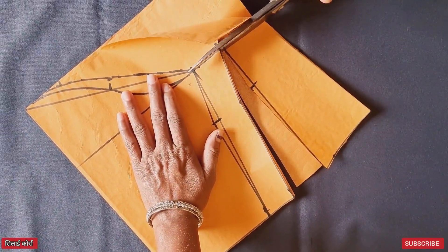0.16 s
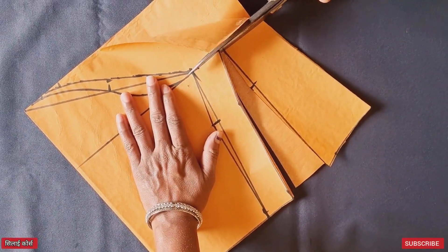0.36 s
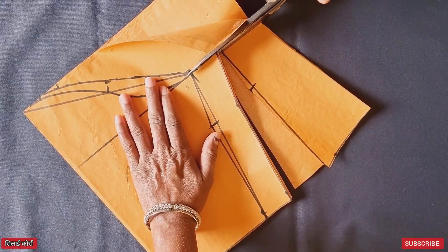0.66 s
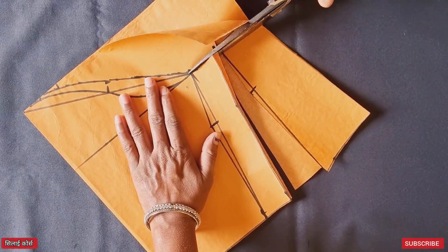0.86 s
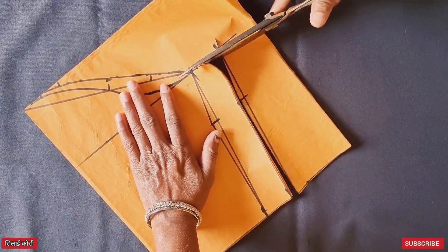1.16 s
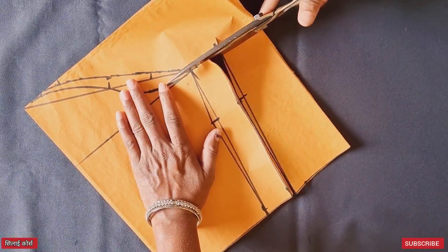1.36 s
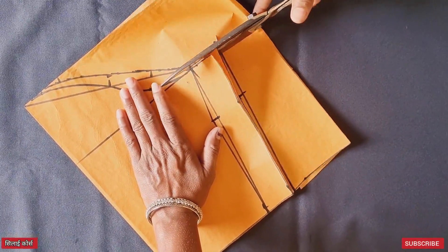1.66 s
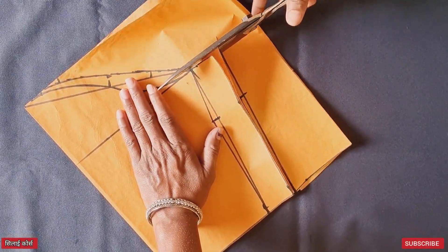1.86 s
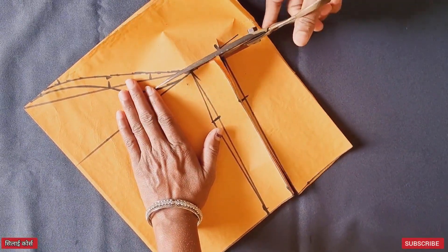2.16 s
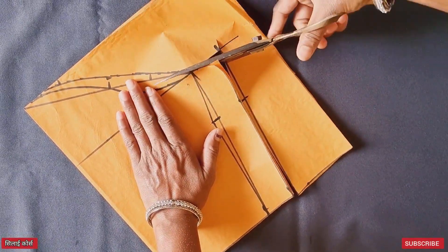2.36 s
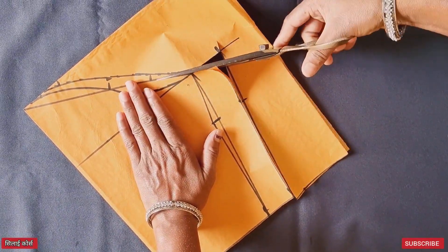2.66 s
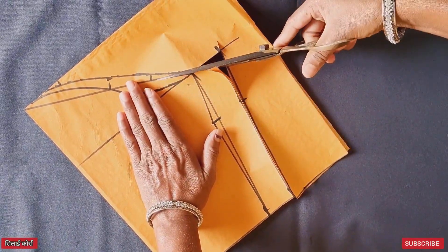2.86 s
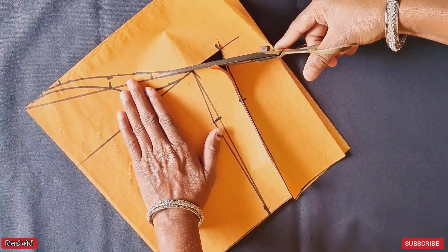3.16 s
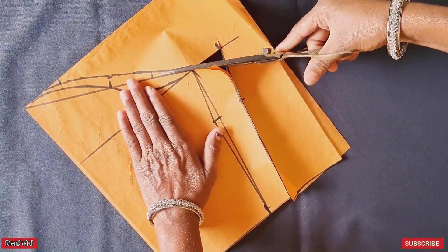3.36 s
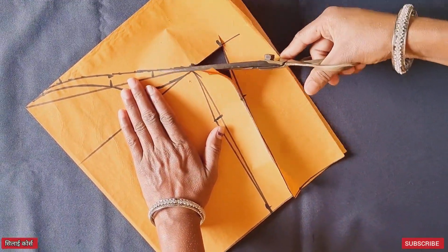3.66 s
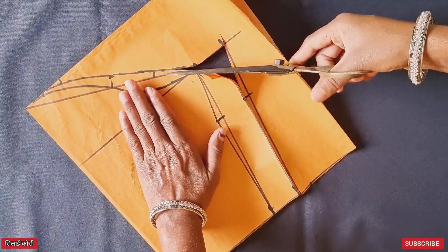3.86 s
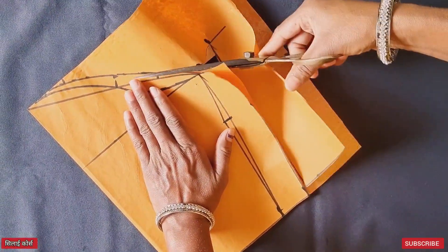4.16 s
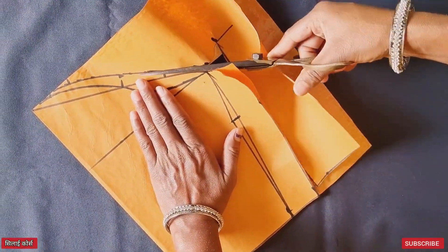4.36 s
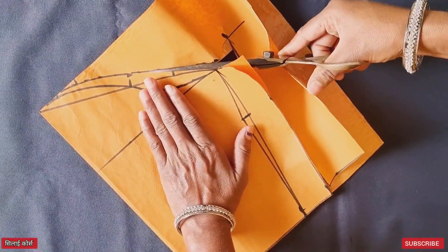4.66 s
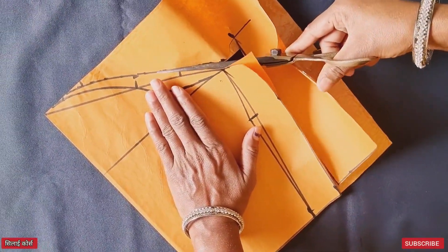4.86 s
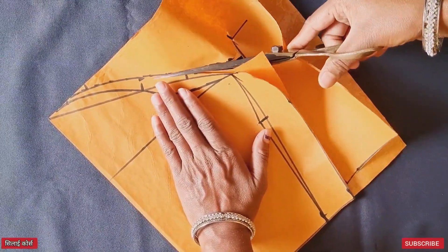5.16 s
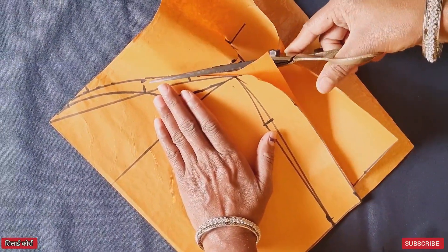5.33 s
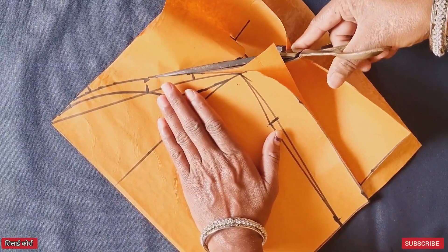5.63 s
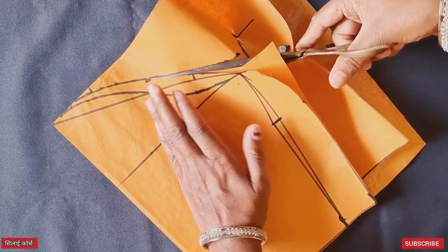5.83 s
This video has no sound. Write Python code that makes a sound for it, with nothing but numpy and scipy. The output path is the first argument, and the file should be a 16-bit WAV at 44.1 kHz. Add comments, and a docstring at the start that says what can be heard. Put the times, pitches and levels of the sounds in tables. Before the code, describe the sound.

Close-up paper cutting: crisp grainy snips and rustles over soft table thumps, starting faint and building to the loudest cuts late.

```python
"""Scissors through folded paper

Close up, on a cloth-covered wooden table: sheets slide and hiss, blades bite in short tearing bursts, creases snap.
Paper is grainy noise and clicks through a bank of coloured bands; the table is friction noise and jolts
through resonant modes, as the lower blade drags on its top. A faint thin ring is noise in narrow resonances,
over steady room and microphone noise. Two microphone ports hear it all in stereo.
"""
import sys
import numpy as np
from scipy import signal
from scipy.io import wavfile

SR = 44100
rng = np.random.default_rng(int(sys.argv[2]) if len(sys.argv) > 2 else 0)


def inscribe(sig):
    """Save sig as 16-bit PCM at rate SR to the path in sys.argv[1].

    A 1-D sig is mono; a 2-D sig holds one channel per row.
    Samples are clipped to [-1, 1] before scaling.
    """
    pcm = np.round(np.clip(np.atleast_2d(sig).T, -1, 1) * 32767)
    wavfile.write(sys.argv[1], SR, pcm.astype(np.int16))


N = 264245


def from_db(db):
    """Amplitude gain of a level in dB."""
    return 10 ** (np.asarray(db) / 20)


def rms_one(x):
    """Scales a signal to rms 1."""
    return x / np.sqrt(np.mean(x ** 2) + 1e-20)


def in_time(rows):
    """Turns the columns after t into curves, one value a sample."""
    seconds, *columns = np.transpose(rows)
    return [np.interp(np.arange(N) / SR, seconds, column) for column in columns]


def at_hz(points, hz):
    """Reads a spectrum table along a log-frequency axis."""
    table_hz, values = np.array(points).T
    return np.interp(np.log(hz), np.log(table_hz), values)


def drift(rate_hz):
    """Slow random wander of rms 1: noise through two equal low-pass poles at rate_hz."""
    step = 40     # samples between the points of the wander
    r = np.exp(-2 * np.pi * rate_hz * step / SR)
    noise = rng.standard_normal(N // step + 2002)
    slow = signal.lfilter([1], [1, -2 * r, r * r], noise)[2000:]     # drops the filter's start-up
    return np.interp(np.arange(N) / step, np.arange(len(slow)), rms_one(slow))


def bands(low_hz, count, per_octave):
    """Centre and band-pass filter of each band of a bank."""
    edges = low_hz * 2 ** (np.arange(count + 1) / per_octave)
    edges = np.minimum(edges, .45 * SR)
    return [(np.sqrt(a * b), signal.butter(2, [a, b], "band", fs=SR, output="sos"))
            for a, b in zip(edges, edges[1:])]


def ports(mid, side, alike, lean_db):
    """Mixes two independent signals into ports with a set likeness and left-minus-right level."""
    alike = np.clip(alike, -1, 1)
    opposite = np.array([[1], [-1]])
    shared = np.sqrt(1 + alike) * mid
    differing = np.sqrt(1 - alike) * side * opposite
    return from_db(lean_db / 2 * opposite) * (shared + differing) / np.sqrt(2)


def resonate(x, modes):
    """Sums parallel two-pole resonances with alternating signs."""
    out = 0
    for k, (hz, width_hz, level_db) in enumerate(modes):
        r = np.exp(-np.pi * width_hz / SR)
        poles = [1, -2 * r * np.cos(2 * np.pi * hz / SR), r * r]
        ring = signal.lfilter([(1 - r * r) / 2, 0, (r * r - 1) / 2], poles, x)
        out = out + (-1) ** k * from_db(level_db) * ring
    return out


# Likeness of the two ports, for paper and room: f/Hz, likeness [1 same, 0 unrelated, -1 opposite]
LIKENESS = [(60, .9), (350, .9), (700, .5), (1700, .65), (2400, .55), (3000, .25), (4500, -.1), (6500, .3),
            (8000, 0)]
LEAN_DB = 1.7     # left minus right, for room and table
# Relative spectrum of the room and microphone noise: f/Hz, level/dB per Hz
ROOM = [(15, -43), (25, -6), (102, -2.5), (189, -11.5), (241, -42.5), (284, -3), (449, -58), (637, -72),
        (791, -36.5), (9210, -46.5), (15800, -27.5)]
ROOM_DB = -63     # rms over both ports


def room():
    """Steady room and microphone noise: white noise shaped by a bank of half-octave bands."""
    white = rng.standard_normal((2, 2, N))     # neighbouring bands take turns with two sources
    noise = 0
    for k, (hz, sos) in enumerate(bands(19.65, count=19, per_octave=2)):
        heard = ports(*signal.sosfilt(sos, white[k % 2]), at_hz(LIKENESS, hz), LEAN_DB)
        noise = noise + from_db(at_hz(ROOM, hz)) * heard
    return from_db(ROOM_DB) * rms_one(noise)


# Hiss of the sliding sheets: t/s, level near 2 kHz/dB, before its random wander
SLIDE = [(0.0, -87), (.15, -87.5), (.22, -77.5), (.4, -73.5), (.65, -61), (.89, -62.5), (1.0, -54),
         (1.47, -55), (1.53, -60.5), (1.62, -57), (1.77, -51.5), (2.0, -62), (2.11, -56), (2.22, -64.5),
         (2.33, -51.5), (2.55, -75), (2.88, -79.5), (3.0, -64.5), (3.2, -77), (3.33, -59.5), (3.72, -65.5),
         (3.99, -45), (4.1, -52), (4.33, -82), (4.44, -54.5), (4.66, -72.5), (4.77, -44.5), (4.9, -52.5),
         (5.1, -56), (5.32, -64), (5.44, -54.5), (5.66, -60), (5.77, -56.5), (5.99, -59.5)]


def sliding():
    """Hiss level of the sheets in dB; it flutters as the sheet sticks and lets go."""
    (slide_db,) = in_time(SLIDE)
    return slide_db + 0.5 * drift(36) + 0.13 * drift(81)


def paper_effort(treble_db, low_db):
    """Log amplitude of the fibre noise in low mids, body and treble: sliding, nibbles and bites."""
    slide_db = sliding()
    power = from_db([slide_db + low_db, slide_db, slide_db + treble_db]) ** 2 * nibbling()
    add_bites(power, low_db)
    return np.log(power) / 2


def grain():
    """Uneven loudness of the hiss, rms 1: fibres tear in tiny clumps, 900 a second on average."""
    sizes = from_db(0.97 * np.minimum(rng.exponential(1, N), 5))
    clumps = sizes * (rng.random(N) < 900 / SR)
    return rms_one(1 + 0.77 * signal.lfilter([1], [1, -.9], clumps))


CRACKLE_PER_S, CRACKLE_DB = 150, (11.9, 19)     # average rate; range of click height against the hiss


def crackle():
    """Single fibres break at random: sample, height and home band of each click."""
    breaks = np.flatnonzero(rng.random(N) < CRACKLE_PER_S / SR)
    height = from_db(rng.uniform(*CRACKLE_DB, len(breaks)))
    home_band = rng.uniform(0.51, 17.8, len(breaks))
    return breaks, height, home_band


# Usual colour of the paper noise at the microphone: f/Hz, level/dB per Hz
PAPER = [(650, -28.5), (950, -25.5), (1300, -18), (1750, -10), (2000, -8), (2350, 1.5), (2800, -5),
         (3300, -9.5), (5000, -14), (7500, -19), (8600, -20.5), (10200, -36), (12000, -23), (14500, -21)]
# Port balance for paper: f/Hz, left minus right level/dB
PORT_BALANCE = [(700, 2.6), (1200, -2), (2000, -7), (2600, -8), (3600, -5), (5500, -4), (8000, 2),
                (10000, -2), (14000, -10.5)]
# Colour as the sheets lift and settle:
# t/s, treble level/dB, low-mid level/dB, air level/dB, main resonance f/Hz before its wander
SHEET = [(0.0, 10, -2, 3, 2450), (.4, 10.5, -7, -3, 2330), (.7, 11, 3, -5.5, 2240),
         (.97, 11, 6.5, -3.5, 2510), (1.25, 8, 4, -3.5, 2310), (1.5, 9, 5.5, -1.5, 2250),
         (2.0, 6, 8.5, -3, 2240), (2.2, 5.5, -1, -5, 2300), (2.4, 5.5, 2, -5, 2270),
         (2.65, 9.5, 5, -10, 2500), (3.0, 4.5, 5, 3.5, 2160), (3.5, 10, -3, -1, 2420),
         (3.8, 7.5, 8, 1, 2570), (4.1, 7.5, 8, -3, 2370), (4.5, 3, 13.5, -1.5, 2260),
         (4.68, -1, 12.5, 0.5, 2210), (4.8, 4, 9.5, -7, 2160), (5.1, 10.5, 11.5, -1, 2330),
         (5.45, 2.5, 11, -4.5, 2250), (5.7, 13, 13, 2, 2480), (5.99, 8, 11, 0.5, 2450)]
SHEET_WANDER = .022     # rms share by which the resonance strays
LOW_MID_HZ, BODY_HZ, TREBLE_HZ, AIR_HZ = 1300, 2350, 5800, 13000     # where the colour levels apply in full


def paper():
    """Grainy fibre noise, crackle and snaps pass through the shifting colour of sheet and microphone."""
    treble_db, low_db, air_db, sheet_hz = in_time(SHEET)
    sheet_hz = sheet_hz * (1 + SHEET_WANDER * drift(6.3))
    low, body, treble = paper_effort(treble_db, low_db)
    white = rng.standard_normal((2, 2, N)) * grain()
    breaks, height, home_band = crackle()
    bank = bands(629.0, count=23, per_octave=5)
    # the usual colour's rms from 1.4 to 3.4 kHz sets the reference level
    body_power = [from_db(2 * at_hz(PAPER, hz)) * hz * .28 / SR for hz, sos in bank if 1400 < hz < 3400]
    body_rms = np.sqrt(sum(body_power))
    out = 0
    for k, (hz, sos) in enumerate(bank):
        # shares of treble, low mids and air in this band
        up = np.clip(np.log(hz / BODY_HZ) / np.log(TREBLE_HZ / BODY_HZ), 0, 1)
        down = np.clip(np.log(hz / BODY_HZ) / np.log(LOW_MID_HZ / BODY_HZ), 0, 1)
        air = np.clip(np.log(hz / TREBLE_HZ) / np.log(AIR_HZ / TREBLE_HZ), 0, 1)
        # the resonance slides, less so towards the treble
        slid_hz = hz * (BODY_HZ / sheet_hz) ** (1 - up)
        colour_db = at_hz(PAPER, slid_hz) + air * air_db
        fibres = white[k % 2].copy()
        fibres[0, breaks] += (-1) ** k * height * np.exp(-((k - home_band) / 4) ** 2)
        effort = np.exp(body + up * (treble - body) + down * (low - body))
        flicker = from_db(0.75 * drift(12.0) + 1.28 * drift(2.8))     # each band wavers by itself
        drive = fibres * effort * flicker
        add_snaps(drive, k, up, air)
        heard = signal.sosfilt(sos, drive * from_db(colour_db) / body_rms)
        out = out + ports(*heard, at_hz(LIKENESS, hz), at_hz(PORT_BALANCE, hz))
    return out


# Blade pressing on the table: full at t/s, rise/s, hold/s, low hum level/dB,
# middle modes against the hum level/dB, top modes against the hum level/dB
DRAGS = [(0.204, 0.034, 0.096, -54.5, 0.5, -5), (0.366, 0.022, 0.035, -51, 3, -1),
         (.45, 0.074, .14, -41.5, -3, -5), (0.641, 0.066, 0.084, -42.5, -1, -3),
         (0.89, 0.15, 0.097, -60, 0, -5.5), (1.362, 0.15, 0.066, -67.5, 0, -1),
         (1.621, 0.043, 0.062, -44, -17, -39), (1.928, 0.065, 0.094, -56.5, -0.5, -11),
         (2.08, 0.05, 0.07, -46, -12.5, -28), (2.295, .04, .08, -60.5, -14, -20),
         (2.69, .05, 0.036, -59.5, -9, -31), (2.902, .03, 0.084, -60.5, 5, -7.5),
         (3.016, 0.068, 0.02, -53.5, 5.5, -3.5), (3.256, 0.022, 0.093, -49.5, 1.5, -4),
         (3.354, 0.057, .09, -38, -8.5, -4.5), (3.62, .08, 0.16, -51.5, -6.5, -12),
         (3.963, 0.2, .08, -45, -14.5, -28.5), (4.18, 0.054, 0.097, -52.5, -18, -37),
         (4.452, 0.11, 0.042, -46, -3, -3.5), (4.774, 0.13, 0.07, -46, 2.5, 0),
         (4.995, .05, 0.55, -53.5, -8.5, -14.5), (5.321, 0.077, 0.023, -50, 2, -4.5),
         (5.393, 0.028, 0.058, -49.5, 7.5, 4.5), (5.525, .04, 0.049, -52.5, 1, 0),
         (5.68, 0.11, 0.071, -56.5, 0.5, -4), (5.877, 0.29, .03, -48.5, -13.5, -15.5),
         (5.97, .04, .01, -50.5, 9.5, -18)]
LET_GO_DB_PER_S = 114     # the pressure eases after each hold
# Blade only resting on the cloth: level/dB of low, middle and top modes
RESTING_DB = (-70.5, -75, -79.5)


def pressure():
    """Friction gain on low, middle and top modes: each drag rises, holds and eases off."""
    t = np.arange(N) / SR
    power = from_db(RESTING_DB)[:, None] ** 2
    for full, rise, hold, level_db, middle_db, top_db in DRAGS:
        press = np.clip(1 + (t - full) / rise, 0, 1) ** 2
        ease = from_db(-LET_GO_DB_PER_S * np.maximum(t - full - hold, 0))
        gains = from_db(level_db + np.array([[0], [middle_db], [top_db]]))
        power = power + (press * ease * gains) ** 2
    return np.sqrt(power)


# Modes of the table top, low, middle and top groups: f/Hz, width/Hz, relative level/dB
TABLE_LOW = [(52, 25, -17), (88, 14, -9), (109, 8, 0), (140, 20, -17)]
TABLE_HIGH = [(181.1, 4.4, 2.5), (232.5, 25.3, 3.5), (277.5, 61.4, -5), (316.4, 24, -7)]
TABLE_TOP = [(370.6, 12.7, -1), (453.5, 37, 3), (519.6, 75, -1.5), (604, 92, -7), (745, 140, -8),
             (840, 183, -11.5)]
# Modes above 600 Hz against the other top modes: t/s, level/dB
UPPER = [(0.0, -5.5), (1.2, -3), (2.2, -7), (3.0, -11), (3.9, -13), (4.6, -7), (5.99, -7.5)]
# Likeness of the two ports for low, middle, top and upper modes
TABLE_LIKENESS = (.97, .92, .72, .6)


def table():
    """Friction and jolts shake the modes; each drag sets its own mix, a slow curve the upper ones."""
    low, middle, top = pressure()
    upper = top * from_db(in_time(UPPER)[0])
    judder = from_db(0.45 * drift(40))
    knocks = jolts()
    # modes, friction gain, share of the jolts
    groups = ((TABLE_LOW, low, .15), (TABLE_HIGH, middle, .6),
              (TABLE_TOP[:3], top, 1.2), (TABLE_TOP[3:], upper, .6))
    out = 0
    for (modes, pressing, jolt_share), alike in zip(groups, TABLE_LIKENESS):
        rub = rng.standard_normal((2, N))
        scale = np.std(resonate(rub[0], modes))     # steady rubbing alone would ring at rms 1
        force = rub * judder * pressing + jolt_share * knocks * [[1], [0]]
        out = out + ports(*resonate(force, modes), alike, LEAN_DB) / scale
    no_deep_bass = signal.butter(2, 45, "high", fs=SR, output="sos")     # the top radiates none
    return signal.sosfilt(no_deep_bass, out)


# Faint thin ring, perhaps the blades rubbing as they open:
# start t/s, end t/s, f/Hz, rms level over the whole scene/dB, before the swell
RING = [(.13, .33, 4180, -82), (2.6, 2.8, 4200, -77), (2.7, 2.84, 2120, -79), (2.76, 2.92, 920, -81),
        (4.53, 4.68, 790, -73)]


def blade_ring():
    """Rubbing noise in narrow steel resonances, each swelling and fading, sometimes overlapping."""
    t = np.arange(N) / SR
    out = 0
    for start, end, hz, level_db in RING:
        swell = np.sin(np.pi * np.clip((t - start) / (end - start), 0, 1)) ** .5
        steel = rms_one(resonate(rng.standard_normal(N), [(hz, 45, 0)]))     # 45 Hz wide
        out = out + from_db(level_db) * swell * steel
    return out


# Blade jolts on the table top: t/s, impulse level/dB before softening and the modes
JOLTS = [(0.195, -46.5), (0.363, -34.5), (.458, -40), (.489, -42), (0.567, -32.5), (0.614, -34),
         (2.958, -46), (3.254, -41.5), (3.319, -34.5), (3.388, -37), (3.444, -36), (4.405, -43),
         (4.478, -37), (4.693, -46), (4.801, -32.5), (5.391, -37.5)]


def jolts():
    """Impulses of the blade, softened by the contact through the cloth."""
    seconds, level_db = np.transpose(JOLTS)
    hits = np.zeros(N)
    hits[[round(s * SR) for s in seconds]] = from_db(level_db)
    return signal.lfilter([1], [1, -.85], hits)


TAIL_S = 0.081     # amplitude decay time: the sheet keeps trembling after a bite


def bite(half_ms, after_db):
    """Power of one bite and samples before its top: swells, falls a little slower, leaves a rustle."""
    t = np.arange(SR // 3) / SR
    rise = max(half_ms, 1) / 500     # seconds: twice the half width
    u = t / rise
    burst = (u * np.exp(1 - u)) ** 6
    rustle = from_db(2 * after_db) * np.minimum(u, 1) ** 4 * np.exp(-2 * t / TAIL_S)
    return burst + rustle, round(rise * SR)


AFTER_DB, AFTER_LAG = -13, 0.13     # rustle under the top of a -45 dB bite; dB less per dB of harder bite
NIBBLES_PER_S, NIBBLE_DB, NIBBLE_MS = 14, -0.5, 4.36     # average rate; mean power over the hiss; half width


def nibbling():
    """Power factor on the hiss from small bites at random moments."""
    sizes = rng.exponential(1, N) * from_db(2 * NIBBLE_DB)
    nibbles = (rng.random(N) < NIBBLES_PER_S / SR) * sizes
    shape, lead = bite(NIBBLE_MS, AFTER_DB)
    return 1 + np.abs(signal.fftconvolve(nibbles, shape)[:N])


# Blade bites, bursts of tearing fibres:
# t of the top/s, rms level near 2 kHz/dB, treble against it level/dB, half width/ms (at least 1 is used)
BITES = [(0.197, -67.5, 10.5, 5.9), (0.277, -71, 10, 6), (0.367, -64.5, 10, 8.3), (0.453, -52.5, 7.5, 5.3),
         (0.492, -59.5, 11, 5.6), (0.523, -53, 6.5, 9.9), (0.569, -52, 8.5, 5.6), (0.615, -43, 8.5, 4.7),
         (0.657, -49, 11, 5.8), (0.686, -56, 14, 3.4), (0.706, -58, 13.5, 6.5), (0.74, -56.5, 14, 3.1),
         (0.818, -59, 11, 7.4), (0.978, -44.5, -2, 21), (1.015, -43.5, 4, 4.3), (1.046, -47.5, 9, 7.0),
         (1.093, -49, 9.5, 9.7), (1.257, -51.5, 1, 11), (1.291, -54, -3, 10), (1.375, -47, -2, 3.1),
         (1.464, -51.5, 3, 16), (1.557, -44, 9, 3.7), (1.697, -51, 4, 5.7), (1.717, -49.5, 5, 8.8),
         (1.864, -41, -21, 2.8), (1.945, -40.5, 6, 1.5), (1.961, -45.5, 5, 3.7), (1.986, -48.5, 5, 5.9),
         (2.066, -46.5, 8.5, 11), (2.257, -54, 8, 2.1), (2.488, -60, 5, 3.8), (2.533, -60.5, 12, 1.5),
         (2.675, -63.5, -4, 13), (2.71, -66.5, 2, 10), (2.887, -57, 0, 11), (2.954, -48, -7, 5.1),
         (3.018, -51, -7.5, 5.3), (3.055, -57, -2, 4.9), (3.175, -61.5, 0, 4.8), (3.252, -39.5, -5, 4.8),
         (3.309, -44, -1, 8.8), (3.368, -44.5, -2, 9.5), (3.391, -40.5, -11, 2.7), (3.417, -42.5, 2.5, 3.2),
         (3.445, -46.5, 3, 3.6), (3.53, -46.5, 1, 7.5), (3.572, -39.5, 0, 0.84), (3.63, -50.5, 2, 4.5),
         (3.682, -52.5, -3, 9.4), (3.78, -53, -20, 5), (3.814, -51, -0.5, 21), (3.872, -49, 8.5, 20),
         (3.913, -43.5, 1, 2.4), (3.966, -38, 1, 3.6), (4.237, -59, 6, 27), (4.301, -58, 6, 29),
         (4.377, -56, -8, 2.1), (4.399, -31.5, -5, 5.4), (4.44, -29.5, -4.5, 5.1), (4.471, -41.5, 2.5, 7.0),
         (4.506, -50, 0, 5.3), (4.689, -43.5, -6, 2.7), (4.717, -56, 6, 2.3), (4.741, -26, -5, 4.8),
         (4.774, -25.5, 3, 6.7), (4.799, -28.5, -0.5, 6.2), (4.818, -34.5, 4, 8.6), (4.949, -45.5, 6.5, 14),
         (5.049, -42, 6, 0.99), (5.311, -54.5, 10, 13.4), (5.39, -38.5, 5, 4.3), (5.414, -39, 9, 9.9),
         (5.445, -42, 10, 7), (5.469, -42, 8, 4.7), (5.512, -39.5, 8, 5.3), (5.592, -44.5, 4, 2.9),
         (5.644, -49, 11, 2), (5.694, -48, 12, 2.9), (5.74, -51, 8.5, 19), (5.78, -51.5, 16.5, 13.4),
         (5.971, -53, 8.5, 5.3)]
BITE_LOW_DB, BITE_LOW_FOLLOWS = -4, 0.32     # low mids against those of the sliding; dB more per treble dB


def add_bites(power, low_db):
    """Adds each bite's burst of tearing to the power of low mids, body and treble, in place."""
    for top, level_db, bright_db, half_ms in BITES:
        shape, lead = bite(half_ms, AFTER_DB - AFTER_LAG * (level_db + 45))
        start = round(top * SR) - lead
        bite_low_db = low_db[start] + BITE_LOW_DB + BITE_LOW_FOLLOWS * bright_db
        levels = from_db(level_db + np.array([[bite_low_db], [0], [bright_db]]))
        power[:, start:start + len(shape)] += shape[:N - start] * levels ** 2


# Creases snapping: t/s, relative click level/dB, treble against the usual colour level/dB
SNAPS = [(0.615, -38, 0), (1.0157, -41, -1), (1.5404, -39, 9), (1.556, -31, 4), (1.8343, -53, -5),
         (1.8665, -37, -10), (1.879, -45, 0), (1.9447, -45, 9), (1.9606, -41, -1), (2.0627, -26.5, 0.5),
         (2.257, -45, 1), (2.3767, -38.5, 7), (2.4466, -56, 10.5), (2.4934, -52, 3), (2.5333, -49, 4.5),
         (2.6746, -60, 9.5), (3.5292, -34, 2), (3.9143, -38, -2), (4.3323, -64, 11.5), (4.6937, -48, 4.5),
         (4.718, -53, 2), (4.9138, -39, 9), (5.391, -39, -2), (5.505, -50, 10.5), (5.6347, -51, 10),
         (5.646, -36, 8), (5.88, -56, 8)]


def add_snaps(drive, k, up, air):
    """Adds each crease's snap, a one-sample click, to the drive of band k, in place."""
    seconds, level_db, bright_db = np.transpose(SNAPS)
    at = [round(s * SR) for s in seconds]
    click_db = level_db + (up + 1.83 * air ** 3) * bright_db
    drive[0, at] += (-1) ** k * 4 * from_db(click_db)     # alternate signs: the bands add up


def scene():
    """Room, paper, table and blades together."""
    return room() + paper() + table() + blade_ring()


def record(dry):
    """Cuts the top: a steep low-pass, 60 dB down from 16150 Hz."""
    return signal.sosfilt(signal.cheby2(14, 60, 16150, fs=SR, output="sos"), dry)


dry = scene()
out = record(dry)
inscribe(out)
```